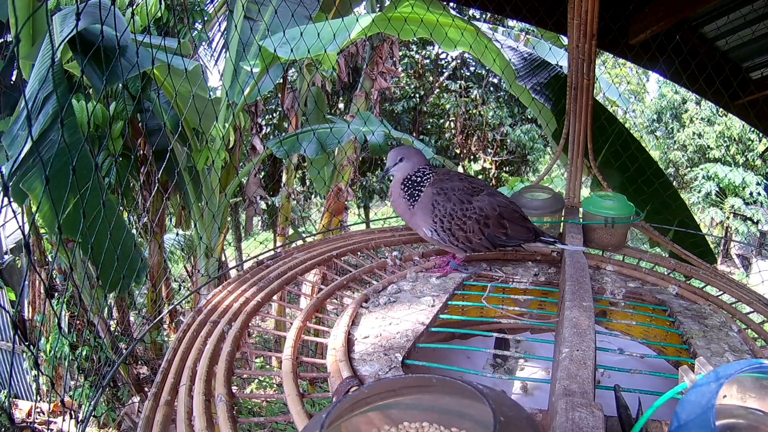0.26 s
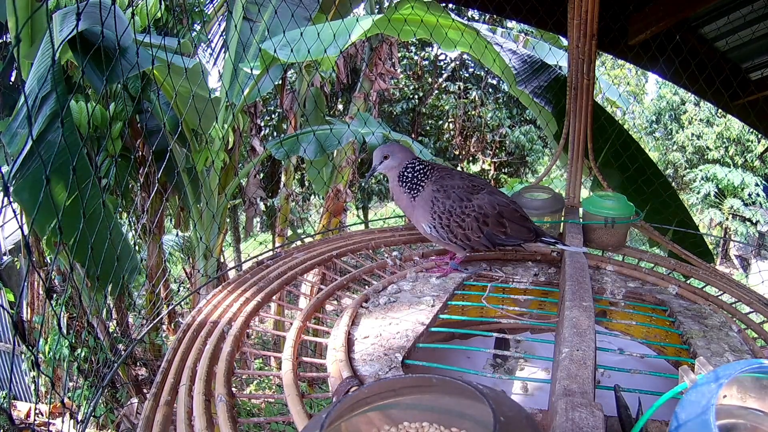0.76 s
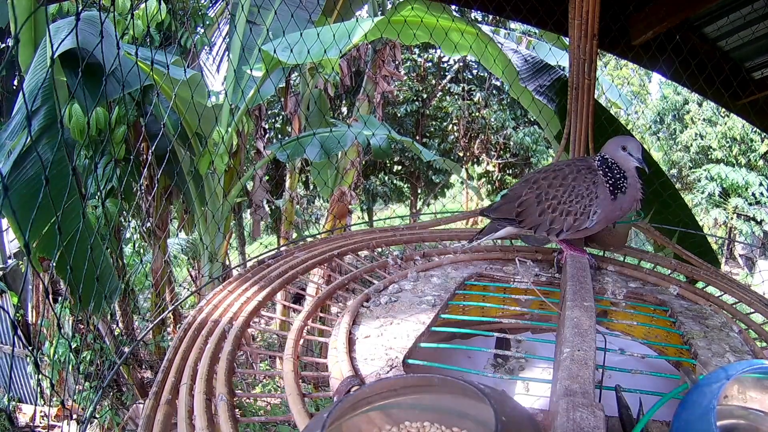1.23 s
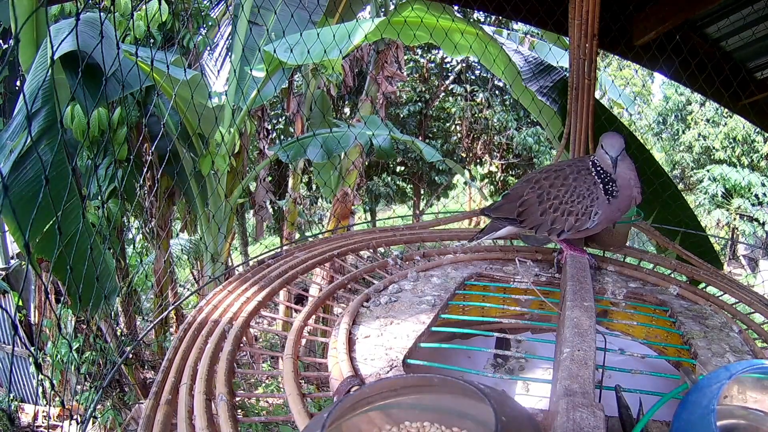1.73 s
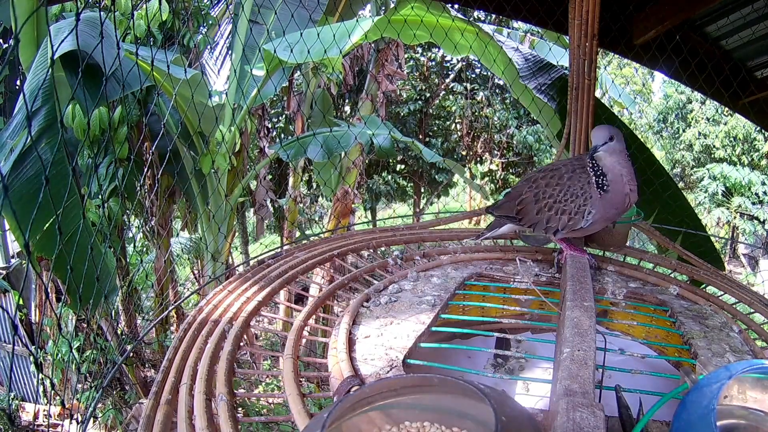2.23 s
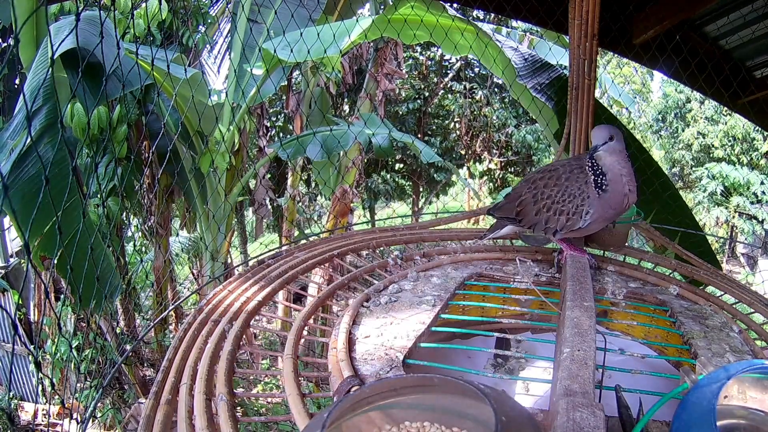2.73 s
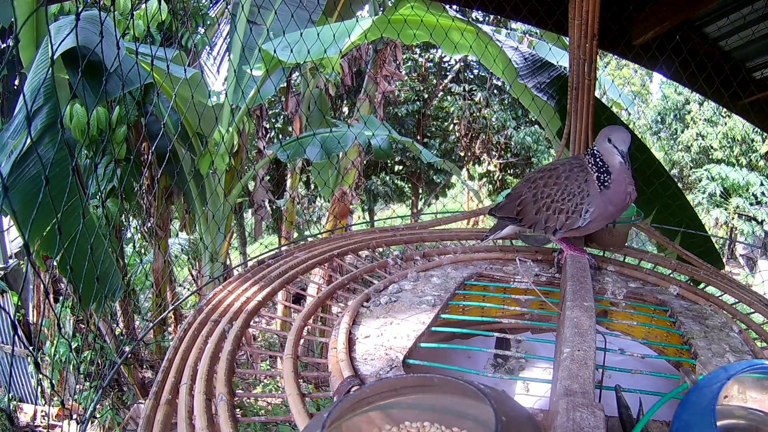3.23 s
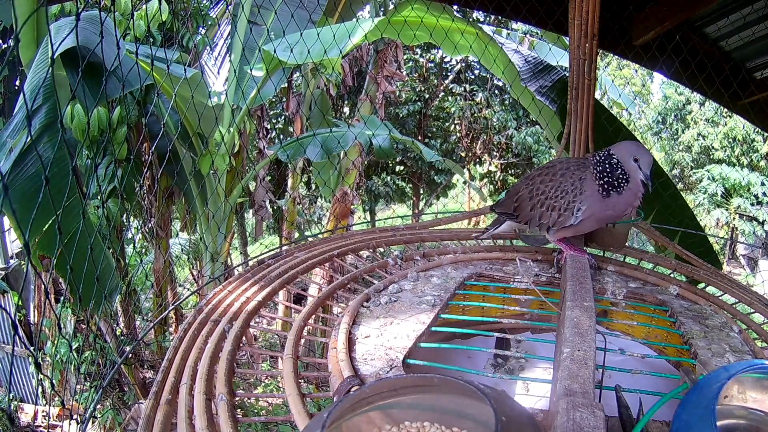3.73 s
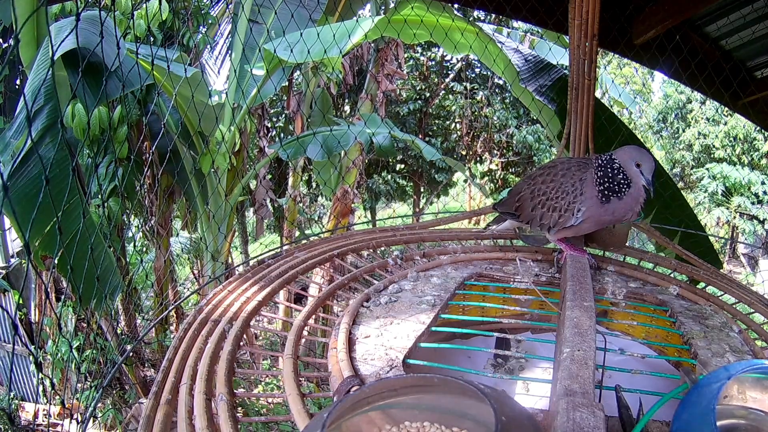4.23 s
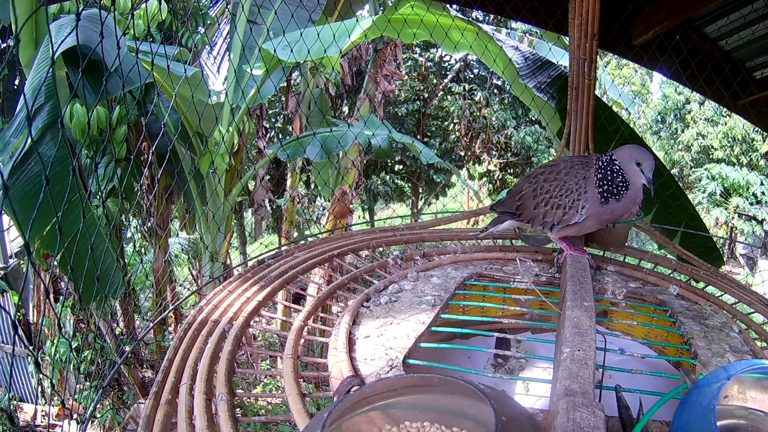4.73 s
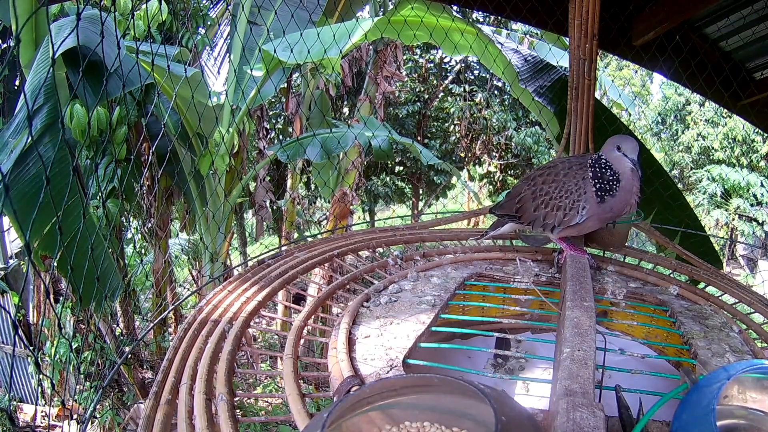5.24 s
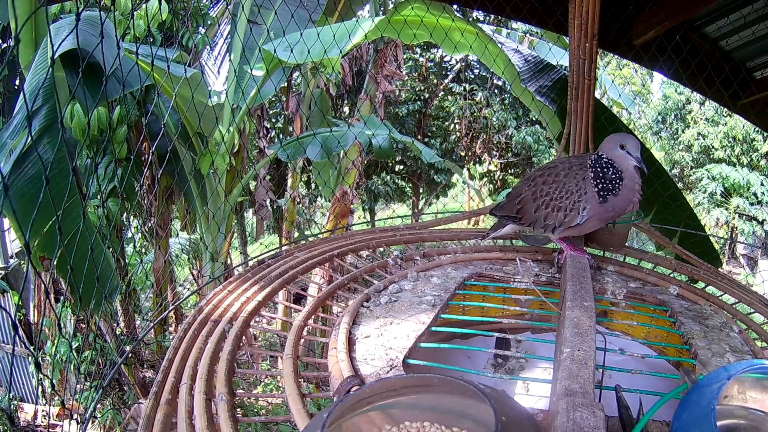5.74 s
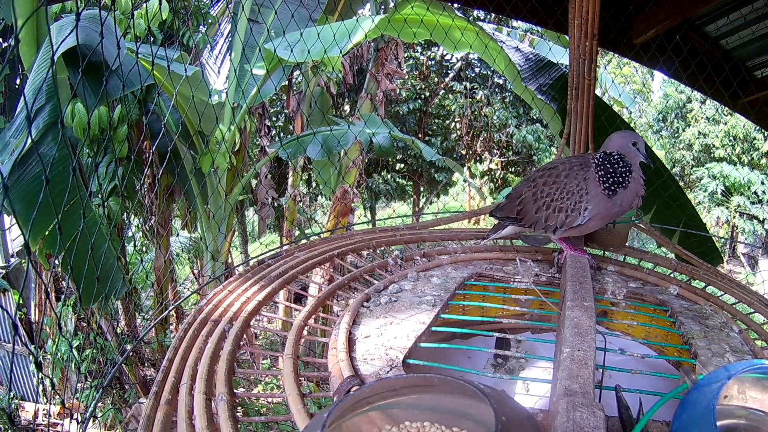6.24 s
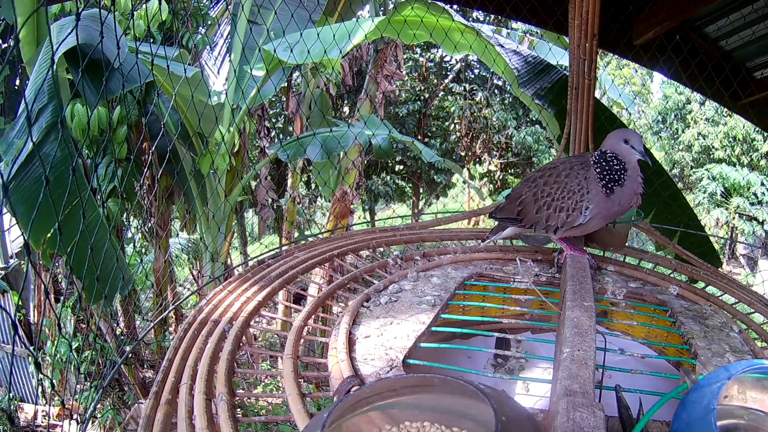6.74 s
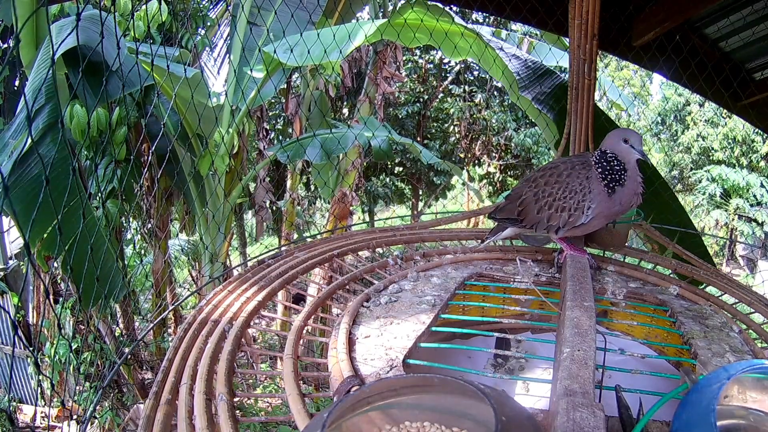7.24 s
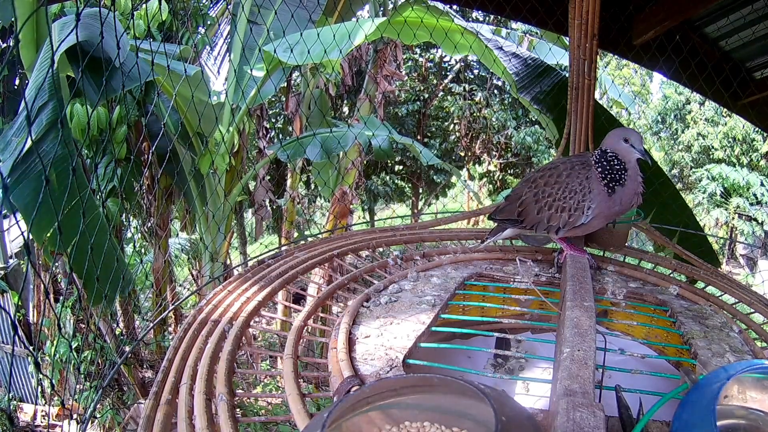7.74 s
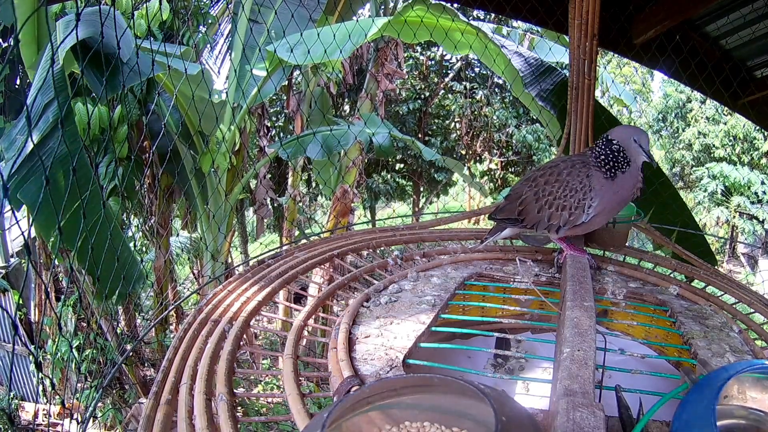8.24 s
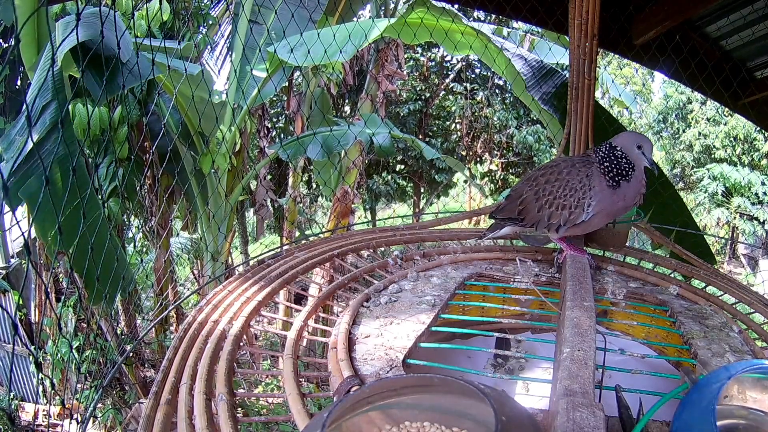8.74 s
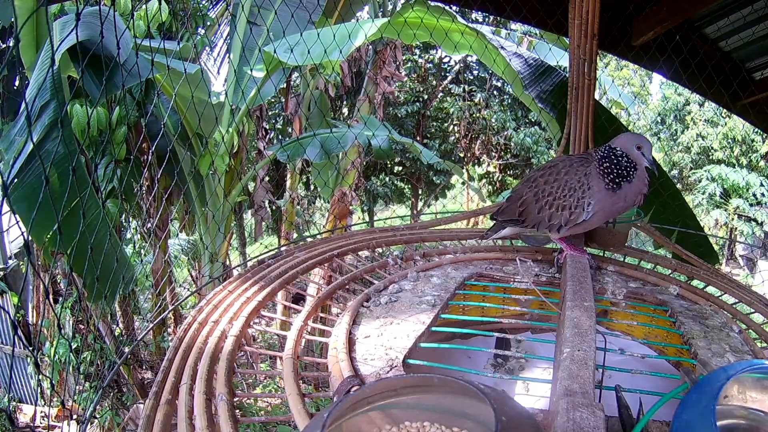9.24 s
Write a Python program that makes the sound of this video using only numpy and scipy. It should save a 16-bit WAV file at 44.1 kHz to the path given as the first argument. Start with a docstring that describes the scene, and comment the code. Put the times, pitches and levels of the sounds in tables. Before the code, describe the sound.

After a puttering engine cuts out, a nearby dove gives two rolling coos over faint birds, far traffic and light wind.

```python
"""A porch by a garden: a spotted dove on a wicker cage coos twice, each time a short hoot, a rising coo and a
long rolled coo. Air pressure bends its almost pure tone, and a valve chops it into the roll. At first a one-
cylinder engine putters nearby; its sound breaks off abruptly. Behind the dove are far traffic, light wind on
the microphone, runs of distant hoots, small birds in the trees, a few hissy rasps and one soft scuff."""
import sys
import numpy as np
from scipy import signal
from scipy.fft import rfft, irfft, next_fast_len
from scipy.io import wavfile
from scipy.ndimage import uniform_filter1d, minimum_filter1d, map_coordinates

SR = 44100
rng = np.random.default_rng(int(sys.argv[2]) if len(sys.argv) > 2 else 0)


def int16_out(signal):
    """Quantize to a 16-bit WAV file."""
    q = np.round(np.clip(np.atleast_2d(signal).T, -1, 1) * 32767)
    wavfile.write(sys.argv[1], SR, q.astype(np.int16))


N = 418068


def amp(db):
    """Decibels to gain."""
    return 10 ** (np.asarray(db) / 20)


def unit(x):
    """Scale to rms 1."""
    return x / np.sqrt(np.mean(x ** 2) + 1e-20)


def curves(rows, t):
    """Breakpoint envelopes: each column after the time, read at the times t."""
    s, *cols = np.transpose(rows)
    return [np.interp(t, s, c) for c in cols]


def wobble(rate):
    """A smooth random curve, rate knots a second."""
    return map_coordinates(rng.standard_normal(int(N * rate / SR) + 4), [np.arange(N) * rate / SR])


def filtered(x, response):
    """x through a complex frequency response."""
    m = next_fast_len(N + SR // 2)
    return irfft(rfft(x, m) * response(np.fft.rfftfreq(m, 1 / SR)), m)[:N]


def coloured(x, spectrum):
    """x through an EQ curve (f/Hz, level/dB), at rms 1."""
    f, db = np.transpose(spectrum)
    return unit(filtered(x, lambda hz: amp(np.interp(np.log(hz + 1), np.log(f), db))))


def noise(spectrum):
    """Coloured noise of rms 1."""
    return coloured(rng.standard_normal(N), spectrum)


def reverb(x, t60):
    """x through a diffuse tail of unit energy."""
    t = np.arange(SR // 2) / SR
    tail = rng.standard_normal(len(t)) * amp(-60 * t / t60) * (1 - np.exp(-t / 0.023))
    return signal.fftconvolve(x, tail / np.linalg.norm(tail))[:N]


def town_bed(rumble_db=-47, hiss_db=-64.5):
    """Steady town rumble under a thin hiss."""
    # colours of the two noises: f/Hz, level/dB
    rumble_eq = [(30, -21.5), (60, -4.5), (100, -1.5), (150, -3), (230, -19), (400, -52), (900, -120)]
    hiss_eq = [(1000, -3.5), (4000, 6.5), (7000, -1), (11000, -2), (15500, 0.5)]
    return amp(rumble_db) * noise(rumble_eq) + amp(hiss_db) * noise(hiss_eq)


def far_traffic(t, drone_trim_db=3, rush_trim_db=9.5):
    """A low traffic drone and a rush of tyres and leaves, both slowly building."""
    # fader rides before the trims: t/s, drone level/dB, rush level/dB
    rides = [(1.0, -51, -59.5), (1.26, -51, -59), (5.58, -47.5, -57), (6.93, -46, -50), (7.38, -46.5, -53),
             (9.1, -38.5, -46), (9.48, -38.5, -48.5)]
    # colours of the two noises: f/Hz, level/dB
    drone_eq = [(80, -11.5), (130, -4), (180, -2), (260, -2.5), (350, -5.5), (450, -7), (700, -50),
                (1500, -120)]
    rush_eq = [(210, -28.5), (350, 2.5), (390, -17), (526, 0.5), (729, -2), (996, -5.5), (1260, -3),
               (1720, -17), (2050, -15.5), (3160, -32.5), (5300, -43), (6150, -41), (6670, -50),
               (9000, -57.5), (11700, -85)]
    drone_db, rush_db = curves(rides, t)
    drone = amp(drone_db + drone_trim_db + wobble(9)) * noise(drone_eq)
    rush = amp(rush_db + rush_trim_db + 0.87 * wobble(9.4)) * noise(rush_eq)
    return drone + rush


def passing_vehicle(t, nearest_s=6.95, hum_width_s=.9, tyres_width_s=.6, tyres_db=-48):
    """Engine hum and tyre noise swell as a far vehicle nears and fade as it leaves."""
    # engine harmonics at the nearest point: f/Hz, level/dB
    harmonics = [(61, -44.5), (122, -55.5), (183, -53.5), (244, -46), (305, -51.5), (366, -48)]
    # colour of the tyres: f/Hz, level/dB
    tyres_eq = [(700, -27), (1150, -5), (1500, 3.5), (1800, -13), (2200, -11.5), (3000, -37.5),
                (6000, -120)]
    shaft_time = np.cumsum(1 + .012 * wobble(4.3)) / SR
    hum = sum(amp(db + 2.9 * wobble(5)) * np.sin(2 * np.pi * hz * shaft_time) for hz, db in harmonics)
    nearness = lambda width: 1 / np.hypot(1, (t - nearest_s) / width)
    return nearness(hum_width_s) * hum + nearness(tyres_width_s) * amp(tyres_db) * noise(tyres_eq)


def wind(t, breeze_db=-45):
    """A light breeze buffets the microphone, with four gusts."""
    # gusts: t/s, half width/s, level over the breeze/dB
    gusts = [(4.8, .18, 5), (5.42, .22, 4), (7.15, .2, 3), (9.15, .7, 10)]
    # colour of the buffeting: f/Hz, level/dB
    wind_eq = [(8, -9.5), (20, 3.5), (32, 3.5), (48, -2), (65, 2), (90, -4), (200, -31.5), (800, -120)]
    gust_db = sum(db * np.exp(-((t - s) / width) ** 2) for s, width, db in gusts)
    return amp(breeze_db + gust_db + 1.9 * wobble(5)) * noise(wind_eq)


def bird_notes(notes, t, arch, rough, wet_db, t60):
    """Glides scattered by the trees; a note's ends droop by arch, a share of the pitch."""
    song, waver = np.zeros(N), 1 + rough * wobble(700)
    for s, length, start_hz, end_hz, db in notes:
        now = (t > s) & (t < s + length)
        u = (t[now] - s) / length
        pitch = (start_hz + (end_hz - start_hz) * u) * (1 - arch * (2 * u - 1) ** 2) * waver[now]
        song[now] += amp(db) * np.sqrt(2 * np.sin(np.pi * u)) * np.sin(2 * np.pi * np.cumsum(pitch) / SR)
    return (song + amp(wet_db) * reverb(song, t60)) / np.hypot(1, amp(wet_db))


def far_dove(t):
    """Another dove coos once, far off."""
    # the coo: t/s, length/s, start f/Hz, end f/Hz, level/dB
    coo = [(3.29, .23, 770, 750, -43)]
    return bird_notes(coo, t, arch=0.013, rough=0.078, wet_db=-3.5, t60=.3)


def far_hoots(t, slowing_s=.022, duty=.52):
    """Runs of distant hoots: each run slows down, and its hoots lengthen with the spacing."""
    # runs: from t/s, until t/s, first spacing/s, f/Hz, glide/share of the pitch, level/dB
    runs = [(1.79, 2.52, .185, 1305, -.08, -50), (2.77, 3.45, .167, 1295, -.06, -53),
            (5.36, 5.48, .22, 1115, .1, -45), (5.615, 7.0, .116, 1150, .05, -42.5),
            (7.23, 7.3, .14, 1240, -.02, -42), (7.51, 8.3, .198, 1238, -.03, -43),
            (9.32, 9.42, .14, 1198, .02, -39)]
    notes = []
    for s, until, spacing, hz, glide, db in runs:
        while s < until:
            notes.append((s, duty * spacing, hz * (1 - glide / 2), hz * (1 + glide / 2), db))
            s, spacing = s + spacing, spacing + slowing_s
    return bird_notes(notes, t, arch=.04, rough=0.0043, wet_db=-10, t60=0.25)


def small_birds(t, chirp_hz=2577, fall_hz_per_s=8900):
    """Clear whistles, and hoarse chirps that all fall from one pitch at one speed."""
    # hoarse chirps: t/s, length/s, level/dB
    chirps = [(3.827, 0.078, -53), (4.373, 0.039, -54.5), (4.546, 0.036, -49), (4.918, .039, -57.5),
              (5.555, .037, -59), (5.647, 0.0242, -50.5), (5.809, 0.07, -48.5), (6.449, 0.1, -44),
              (6.756, 0.1, -43.5)]
    # clear whistles: t/s, length/s, start f/Hz, end f/Hz, level/dB
    whistles = [(1.55, 0.33, 6100, 6350, -71.5), (1.975, 0.057, 2200, 3990, -54),
                (2.24, .065, 2100, 3350, -60), (3.76, 0.13, 6150, 6250, -71.5),
                (4.38, .063, 4900, 4030, -68), (4.69, .091, 3615, 3220, -60), (5.41, .043, 4600, 5030, -64),
                (6.51, 0.023, 3700, 3820, -60)]
    falls = [(s, length, chirp_hz, chirp_hz - fall_hz_per_s * length, db) for s, length, db in chirps]
    hoarse = bird_notes(falls, t, arch=0, rough=.075, wet_db=-2, t60=.22)
    return hoarse + bird_notes(whistles, t, arch=0.057, rough=0.045, wet_db=-2, t60=0.46)


def rasps(t, grain_db=1.0, wet_db=-10):
    """Scratchy hisses with two resonances, perhaps a scolding bird: each swells to a crest and falls."""
    # rasps in the trees: t/s, length/s, crest/share of the length, centre f/Hz, level/dB
    calls = [(2.898, 0.21, .6, 4470, -54), (4.496, .16, 0.45, 4500, -58), (6.032, .3, 0.84, 3600, -55),
             (7.025, .25, 0.56, 4040, -56), (8.132, 0.29, 0.99, 3970, -46)]
    # their colour: f/multiple of the centre, level/dB
    rasp_eq = [(0.301, -21.5), (0.549, -3.5), (.71, 2.5), (0.851, -6), (1, 4.5), (1.099, -4), (1.3, -14),
               (1.55, -22), (2.2, -42.5)]
    hisses = np.zeros(N)
    for s, length, crest, hz, db in calls:
        swell = np.interp((t - s) / length, [0, np.clip(crest, .1, .95), 1], [0, 1, 0])
        hisses += amp(db) * swell * noise([(hz * k, level) for k, level in rasp_eq])
    hisses *= amp(grain_db * wobble(150))
    return hisses + amp(wet_db) * reverb(hisses, t60=0.2)


def scuff(t, start_s=3.022, db=-39, t60=0.33):
    """A dull brush on the wicker that dies away quickly, perhaps the dove shifting its feet."""
    # colour of the brush: f/Hz, level/dB
    scuff_eq = [(150, -40), (400, 0), (700, -6), (1000, -8), (2000, -25), (6000, -80)]
    age = np.maximum(0, t - start_s)
    return amp(db - 60 * age / t60) * np.minimum(1, age / .002) * noise(scuff_eq)


def engine(t, end_s=0.925, firing_hz=33.31, slowing_hz_per_s=3.5, bark_width_hz=62, throb=0.026):
    """One cylinder, slowing as it nears: each firing rings exhaust and casing, over mechanical clatter."""
    # exhaust resonances: f/Hz, width/Hz, level/dB
    modes = [(65, 9, 1), (95, 15, 4), (120.2, 14, 11), (520, 180, -22)]
    # the exhaust's bark: t/s, centre f/Hz, level over the thump/dB
    bark_path = [(0, 358, -8), (.45, 330, -4), (.7, 314, -2.5), (.925, 258, 0)]
    # colour of casing and clatter: f/Hz, level/dB
    clatter_eq = [(300, -8), (520, -8.5), (660, -11), (760, -15), (980, -17.5), (1130, -10.5), (1500, -15),
                  (1720, -23.5), (2080, -22.5), (2450, -24.5), (3050, -39.5), (3780, -38), (5400, -54),
                  (9000, -62), (13000, -94.5)]
    running_s = np.minimum(t, end_s)
    rate = firing_hz - slowing_hz_per_s * running_s
    cycles = np.cumsum(rate) / SR + .5
    firings = np.diff(np.floor(cycles), prepend=0) * amp(.7 * wobble(29))
    pipe = lambda f: sum(amp(db) * 1j * f * w / (hz * hz - f * f + 1j * f * w) for hz, w, db in modes)
    thump = unit(filtered(firings, lambda f: pipe(f) / (1 + 1j * f / 420) ** 2))
    # the bark is a cluster of firing harmonics that deepens as the engine comes nearer
    centre_hz, bark_db = curves(bark_path, t)
    formant = lambda f: np.exp(-((f - centre_hz) / bark_width_hz) ** 2 / 2)
    cluster = sum(formant(k * rate) * np.cos(2 * np.pi * k * cycles) for k in range(6, 16))
    bark = amp(bark_db + wobble(24.9)) * unit(cluster)
    casing = coloured(reverb(firings, t60=0.13), clatter_eq)
    rattle = noise(clatter_eq) * (1 + throb * np.cos(2 * np.pi * (cycles - .15)))
    clatter = unit(rattle + amp(-1) * casing)
    thump_db, clatter_db = -28 + 2 * running_s, -31 + 2.5 * running_s
    gate = np.clip((end_s - t) / .002, 0, 1)
    return gate * (amp(thump_db) * (thump + bark) + amp(clatter_db) * clatter)


def breath(tune, age, full_hz=561.6, fade_db_per_hz=0.35, unity_hz=746, swell_db_per_hz=0.05):
    """Air pressure lifts pitch and level together: a fast fade below full_hz, a gentle swell above."""
    pitch, = curves(tune, age)
    db = swell_db_per_hz * (pitch - unity_hz) - fade_db_per_hz * np.maximum(0, full_hz - pitch)
    gate = np.clip(np.minimum(age, tune[-1][0] - age) / 0.002, 0, 1)
    return pitch, amp(db) * gate


def syrinx(pitch, level, second_db=-30, third_db=-46, throat_hz=680):
    """An almost pure tone: the swollen throat passes little of the overtones, less as the pitch rises."""
    phase = 2 * np.pi * np.cumsum(pitch) / SR
    overtones = amp(second_db) * np.sin(2 * phase) + amp(third_db) * np.sin(3 * phase)
    return np.sqrt(2) * level * (np.sin(phase) + overtones / (1 + (pitch / throat_hz) ** 6))


def plain_coo(tune, age, steady_hz, flutter_hz, slack_s=0.18, depth=0.74, bend=0.067, rasp=.14):
    """A pure note; until slack_s, wherever it is below steady_hz, the slack membranes flutter."""
    pitch, level = breath(tune, age)
    flutter = np.clip((steady_hz - pitch) / 75, 0, 1) * np.clip((slack_s - age) / 0.011, 0, 1)
    beat = 2 * np.pi * np.cumsum(flutter_hz * (1 + .15 * wobble(50)) * (age > 0)) / SR
    level = level * (1 + depth * flutter * np.sin(beat)) * (1 + rasp * flutter * wobble(600))
    return syrinx(pitch * (1 - bend * flutter * np.cos(beat)), level)


def rolled_coo(age, attack_s=0.024, release_s=0.068, trill_end_s=0.369, rasp=0.058):
    """A valve chops the tone into pulses that open fast, sweep up and fade. The note ends smoother."""
    # tune of the roll: t/s into the note, f/Hz
    tune = [(0, 610), (.011, 667), (.022, 674), (.031, 770), (.125, 755.3), (.22, 724), (.32, 703),
            (.35, 640), (.42, 588), (.44, 534)]
    # its trill: t/s into the note, pulse rate/Hz, sweep at full depth/share of the pitch
    trill = [(0, 39, .25), (.035, 45, .7), (.135, 62, .72), (.195, 73, .4), (.23, 66, .3), (.285, 60, .3)]
    pitch, level = breath(tune, age)
    rate, sweep = curves(trill, age)
    depth = np.clip(np.minimum(age / attack_s, (trill_end_s - age) / release_s), .24, 1)
    cycle = np.cumsum(rate * (1 + .05 * wobble(45)) * (age > 0)) / SR % 1
    opening, closing = cycle / .34, (1 - cycle) / .86
    valve = np.sin(np.pi / 2 * np.minimum(opening, closing)) ** .8
    glide = 1 + depth * sweep * (cycle ** .25 - .5 ** .25) + .006 * wobble(80)
    level = level * amp(0.99 * wobble(60)) * (1 - depth + depth * valve) * (1 + rasp * wobble(1100))
    return syrinx(pitch * glide, level)


def dove(t, rise_db=2, roll_db=1, build_s=0.13, build_db=9.5, muffle_hz=1700, porch_db=-29):
    """Three notes a phrase through a closed beak, with quick reflections from roof, floor and wall."""
    # phrases: hoot t/s, rising coo t/s, rolled coo t/s, base level/dB
    phrases = [(3.521, 3.704, 4.045, -6.5), (8.374, 8.542, 8.885, -6.5)]
    # tunes of the hoot and the rising coo: t/s into the note, f/Hz
    hoot = [(0, 480), (.012, 569), (.026, 686.4), (.044, 739), (.058, 649.5), (.082, 600), (.105, 532),
            (.18, 506)]
    rise = [(0, 520), (.02, 569.6), (.055, 615), (.095, 642), (.122, 733), (.148, 757), (.168, 728),
            (.18, 657), (.188, 496)]
    # hard surfaces round the perch: delay/s, share of the pressure
    walls = [(.00632, .45), (.01102, .18), (.0165, -.08), (.0287, .03)]
    voice = np.zeros(N)
    for hoot_s, rise_s, roll_s, db in phrases:
        fade_in_db = build_db * (np.clip((t - rise_s) / build_s, 0, 1) - 1)
        voice += amp(db) * plain_coo(hoot, t - hoot_s, steady_hz=618, flutter_hz=57.5)
        rising = plain_coo(rise, t - rise_s, steady_hz=732, flutter_hz=74.5)
        voice += amp(db + rise_db + fade_in_db) * rising
        voice += amp(db + roll_db) * rolled_coo(t - roll_s)
    voice = filtered(voice, lambda hz: 1 / (1 + (hz / muffle_hz) ** 6) / (1 + (430 / (hz + 1)) ** 10))
    echoes = sum(share * np.interp(t - delay, t, voice) for delay, share in walls)
    return voice + echoes + amp(porch_db) * reverb(voice, t60=.22)


def scene():
    """Dove and engine in front, birds and garden behind, in mono."""
    t = np.arange(N) / SR
    front = dove(t) + engine(t)
    birds = far_dove(t) + far_hoots(t) + small_birds(t) + rasps(t)
    garden = wind(t) + far_traffic(t) + passing_vehicle(t) + town_bed()
    return (front + birds + garden + scuff(t))[None]


def record(dry):
    """A limiter holds the coos down, and a steep low-pass removes the very top."""
    ceiling, top_hz = .79, 15850
    needed = np.minimum(1, ceiling / (np.abs(dry[0]) + 1e-9))
    held = minimum_filter1d(needed, size=400)
    gain = uniform_filter1d(uniform_filter1d(held, size=200), size=200)
    return filtered(dry[0] * gain, lambda hz: hz < top_hz)[None]


dry = scene()
out = record(dry)
int16_out(out)
```